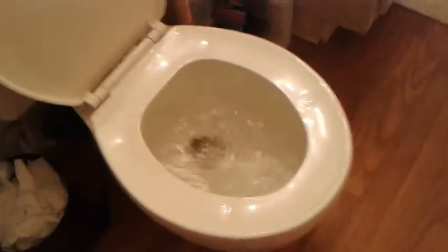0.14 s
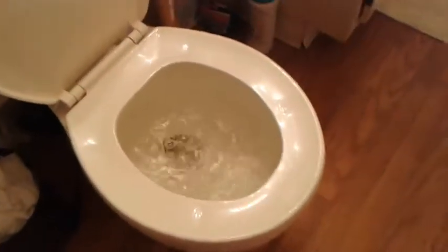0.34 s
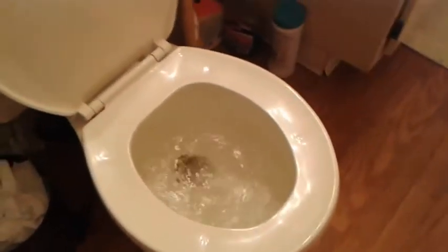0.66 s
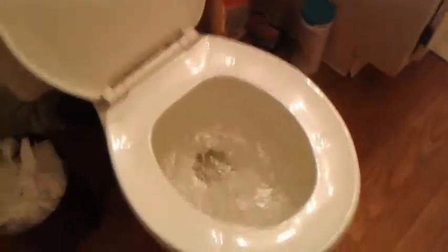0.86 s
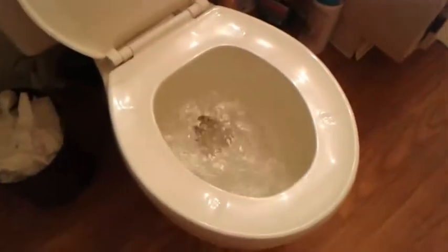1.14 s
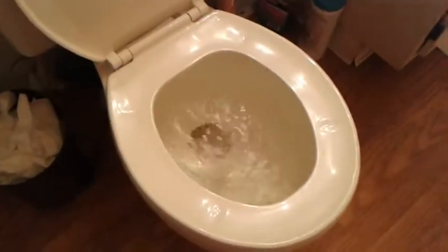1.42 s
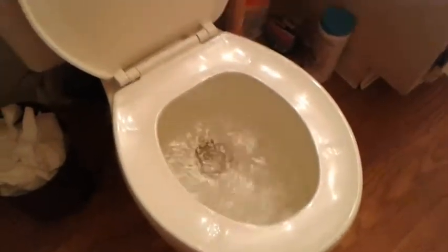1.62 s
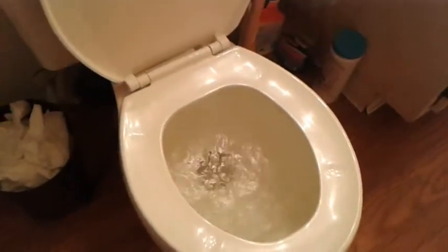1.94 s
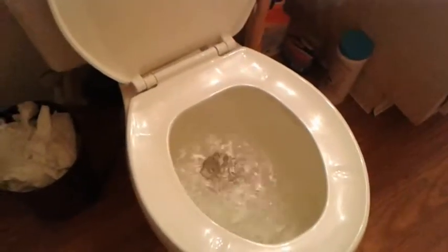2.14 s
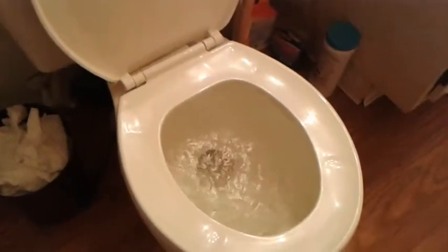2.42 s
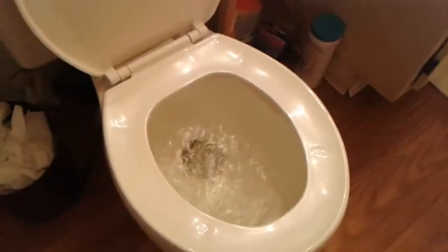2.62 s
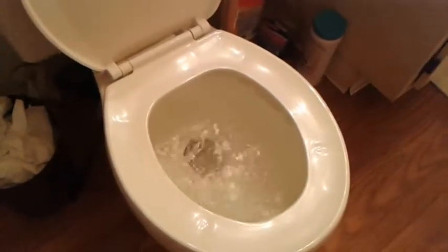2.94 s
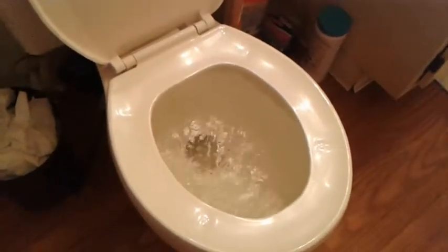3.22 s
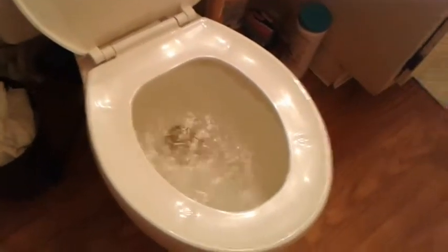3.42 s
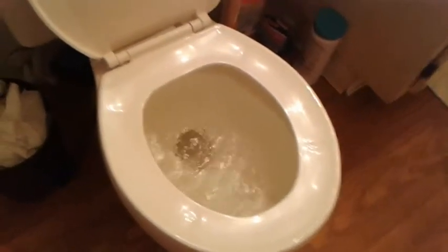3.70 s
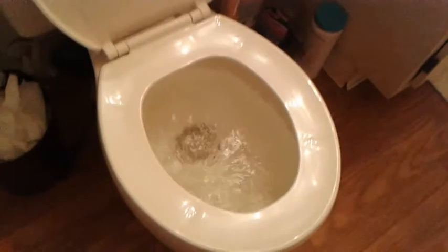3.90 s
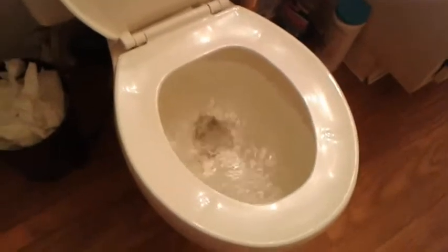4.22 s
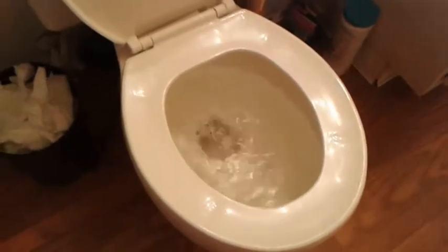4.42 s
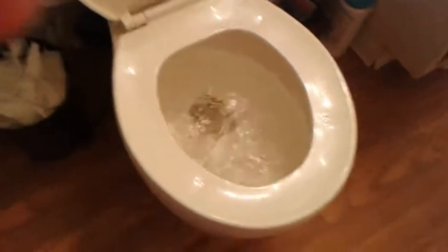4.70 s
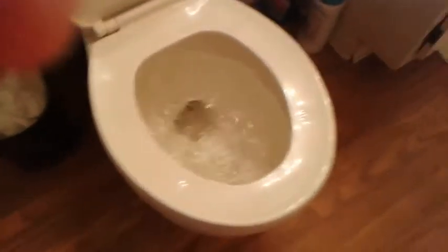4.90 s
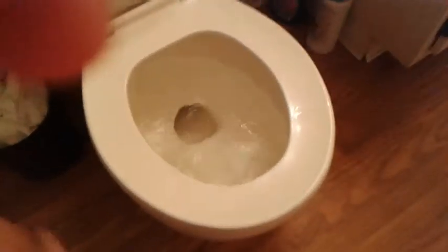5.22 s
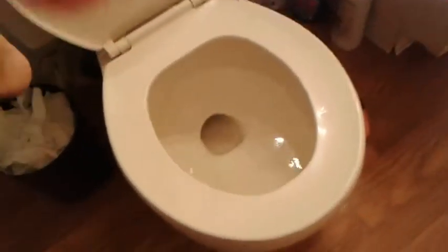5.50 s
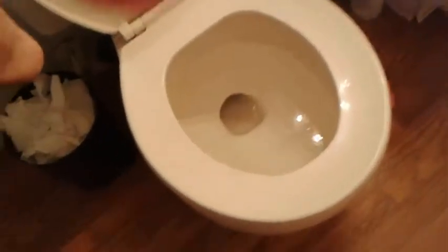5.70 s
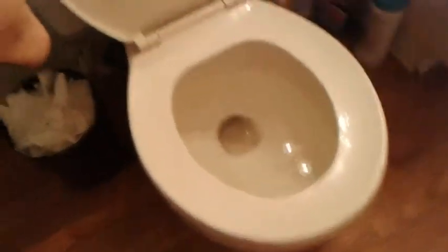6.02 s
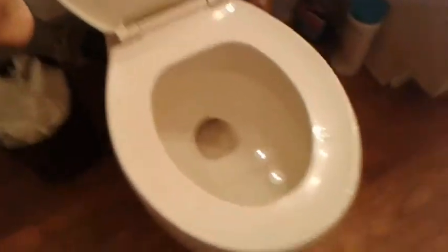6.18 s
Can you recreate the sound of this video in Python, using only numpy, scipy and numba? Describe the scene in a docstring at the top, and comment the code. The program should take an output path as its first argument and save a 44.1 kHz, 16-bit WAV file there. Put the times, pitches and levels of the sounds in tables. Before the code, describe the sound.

A time-reversed flush heard from just above the bowl. Hissing droplets and ringing water tones grow steadily over a faint low hum, with sharp spits and plinking drops each swelling into a sudden stop. Throaty air gulps in the trap get longer and stronger, the spray surges, metal clinks, large bubbles glug, and the water abruptly falls quiet, leaving reversed drips and a last gulp in the small reflective room.

```python
"""A toilet flush in a small bathroom, heard backwards: every splash, bubble and echo swells and then cuts off.
From the start spray hisses (filtered noise and droplets), rim jets whistle and the bowl churns (resonant modes)
over a low hum; spits and drops (rings laid backwards) stand out, and from half a second air gulps in the trap.
Past 5.3 s large bubbles glug, the lever clinks as the rush peaks, a pitched drip follows; the very end fades out.
Two unlike microphone ports hear it all."""
import sys
import numpy as np
from scipy import signal
from scipy.fft import rfft, irfft, next_fast_len
from scipy.io import wavfile
from scipy.ndimage import uniform_filter1d
from numba import njit

SR = 44100
rng = np.random.default_rng(int(sys.argv[2]) if len(sys.argv) > 2 else 0)


def unload_audio(sound):
    """Save the sound as a 16-bit wav file, at the path given as the first command line argument."""
    columns = np.transpose(np.atleast_2d(sound))
    # keep every value between -1 and 1, then stretch to whole-number steps
    steps = np.round(np.clip(columns, -1, 1) * 32767)
    wavfile.write(sys.argv[1], SR, steps.astype(np.int16))


N = 280031  # samples


def undb(db):
    """Level to amplitude: 20 dB is a factor of ten."""
    return 10 ** (np.asarray(db) / 20)


def unit(x):
    """Normalization: scale to an rms of 1."""
    return x / np.sqrt(np.mean(x ** 2))


def curves(table):
    """Linear interpolation in time: each column of a table at every sample."""
    s, *columns = np.transpose(table)
    return [np.interp(np.arange(N) / SR, s, column_values) for column_values in columns]


def over_hz(table, count):
    """Interpolation in log frequency: the table at every bin of a real transform of count samples."""
    hz, value = np.transpose(table)
    bin_hz = np.arange(count // 2 + 1) * SR / count
    return np.interp(np.log(bin_hz + 1), np.log(hz), value)


def walk(rate):
    """Smoothed random fluctuation: levels held 1 / rate seconds and slewed twice; spread near 1."""
    hold = int(SR / rate)
    steps = np.repeat(rng.standard_normal(N // hold + 1), hold)
    return 1.18 * uniform_filter1d(uniform_filter1d(steps, hold), hold)[:N]


def noise():
    """Incoherent excitation: unrelated white noise for each port."""
    return rng.standard_normal((2, N))


@njit
def svf(x, hz, width):
    """Resonance with a moving centre: a state-variable band-pass run from the end to the start."""
    y, band, low = np.empty(len(x)), 0., 0.
    for i in range(len(x) - 1, -1, -1):
        g, damping = np.tan(np.pi * hz[i] / SR), width / hz[i]
        v = (band + g * (x[i] - low)) / (1 + g * (g + damping))
        band, low = 2 * v - band, low + 2 * g * v
        y[i] = damping * v
    return y


@njit
def add(out, s, size, hz, t60, glide, edge, phase):
    """Damped oscillation laid backwards from s: it builds over edge cycles and climbs in pitch as it dies."""
    for n in range(len(s)):
        count = int(t60[n] * SR)
        z, fall = size[n] * np.exp(1j * phase[n]), np.exp(-np.log(1000) / count)
        turn = np.exp(2j * np.pi * hz[n] / SR)
        bend = np.exp(2j * np.pi * hz[n] / SR * glide / count)
        gap, close = 1., np.exp(-hz[n] / SR / edge)
        last = int(s[n] * SR)
        for i in range(last, max(last - count, 0), -1):
            out[i] += z.imag * (1 - gap) ** 2
            z, turn, gap = z * turn * fall, turn * bend, gap * close


def rings(s, db, hz, t60, glide, edge=1.9):
    """Damped oscillations at two points: each ring reaches the two ports with its own phase."""
    out, phase = np.zeros((2, N)), rng.uniform(0, 2 * np.pi, (len(s), 2))
    s, t60 = np.minimum(s, (N - 1) / SR), np.maximum(t60, 1e-3)
    for port in range(2):
        add(out[port], s, undb(db), 1. * hz, t60, glide, edge, phase[:, port].copy())
    return out


def bubbles(per_s, low_hz, high_hz, cycles, scatter_db):
    """Bubble resonance, pitch set by size: a random swarm with uneven pitches and levels."""
    u = rng.random((int(per_s * N / SR), 3)).T
    hz = low_hz * (high_hz / low_hz) ** u[1]
    return unit(rings(u[0] * N / SR, scatter_db * u[2] ** 2, hz, cycles / hz, 0.35))


def resonate(drive, modes, flicker_db, rate, pitch=1):
    """Modal resonance: each mode flickers on its own, and all follow one pitch ratio."""
    out = np.zeros((2, N))
    for hz, width, db in modes:
        gain = undb(db + flicker_db * walk(rate)) / np.sqrt(width)
        out += gain * np.array([svf(x, hz * pitch * np.ones(N), 1. * width) for x in drive])
    return unit(out)


def spray(db):
    """Broadband impact noise: hiss and fine droplets on the porcelain, shaped in frequency."""
    # Each row: frequency in Hz, relative spectral level in dB per Hz.
    spectrum = [(1410, -20), (2400, -9.5), (2620, -13), (3440, -9), (4840, -5.5), (5950, 2.5), (7480, -7),
                (8160, -20), (8800, -42.5), (11400, -61.5), (19400, -120)]
    count = next_fast_len(N)
    droplets = bubbles(900, 3470, 8650, 39, 27.0)
    fizz = noise() * undb(2.12 * walk(40)) + undb(-8.5) * droplets
    shaped = irfft(rfft(fizz, count) * undb(over_hz(spectrum, count)), count)[:, :N]
    return unit(shaped) * undb(db)


def splash(db):
    """Bubble-driven resonance: coarser droplets where the streams meet."""
    drive = noise() + undb(-1.0) * bubbles(500, 2693, 4900, 53, 1.0)
    # Each row: frequency in Hz, width in Hz, relative level in dB.
    modes = [(2710, 620, -2.5), (3070, 1200, 7.5), (3290, 90, -4), (3700, 430, -1.5), (4470, 390, -3.0)]
    return resonate(drive, modes, 1.4, 18.0) * undb(db - 7.0)


def jets(db):
    """Cavity resonance: water through the rim holes sings in the hollow rim; upper modes drift, lower stay."""
    # Each row: frequency in Hz before the pitch ratio, width in Hz, relative level in dB.
    upper_modes = [(2395, 26, 2), (2435, 24, 2), (2465, 24, 5), (2510, 26, 4), (2545, 26, 4),
                   (2600, 34, -1), (2670, 30, -9), (2865, 34, -5)]
    # Each row: frequency in Hz, width in Hz, relative level in dB.
    lower_modes = [(1790, 30, -9), (1990, 22, -2), (2140, 18, -1), (2172, 20, -4), (2265, 45, -2),
                   (2170, 260, -6)]
    # Each row: time in seconds, pitch ratio of the upper modes, lower modes against upper in dB,
    # pitch wander as a share.
    drift = [(0, 0.99, -3, .002), (2.6, 1.0, -6.5, .003), (3.2, 1.02, -7.5, .03), (3.95, 1.01, -6.5, .03),
             (4.35, 1.075, -10, 0.022), (4.7, 1.06, -8.5, .02), (5.3, 0.98, -5, .02)]
    drive = noise() * undb(3.2 * walk(50)) + undb(-11.5) * bubbles(400, 1777, 3006, 21.4, 6.0)
    pitch, low_db, wander = curves(drift)
    upper = resonate(drive, upper_modes, 1.8, 12., pitch + wander * walk(10))
    lower = resonate(drive, lower_modes, 2.6, 14.)
    return unit(upper + undb(low_db) * lower) * undb(db - 0.5)


def churn(db):
    """Bubble-driven resonance at lower pitch: larger bubbles tumbling in the bowl."""
    # Each row: frequency in Hz, width in Hz, relative level in dB.
    modes = [(1010, 86, -20), (1122, 32, -3), (1343, 22, -5.5), (1435, 35, -4.5), (1663, 25, -1.5),
             (1780, 49, -0.5), (1340, 1300, 4)]
    drive = noise() + undb(-8.5) * bubbles(250, 760, 2003, 17.4, 8.4)
    return resonate(drive, modes, 3.0, 6.) * undb(db - 4)


def column(db, hz, width, modes, skirt_db):
    """Air-column resonance: a centre moving with the water level picks out the fixed modes near it."""
    drive = noise() + undb(-14.0) * bubbles(120, 202.4, 969.5, 29.3, 7.5)
    hz = hz * (1 + 0.028 * walk(10))
    skirt = np.array([svf(svf(x, hz, 2 * width), hz, 2 * width) for x in drive])
    near = np.array([svf(x, hz, width) for x in skirt])
    sound = resonate(near, modes, 1.0, 3.3) + undb(skirt_db) * unit(skirt)
    # the passing flow keeps the column sounding at a steady strength
    span = int(.07 * SR)
    power = uniform_filter1d(uniform_filter1d(sound[0] ** 2, span), span)
    return sound / np.sqrt(power) * undb(db + 1.2 * walk(14))


def trap(low_db, low_hz, high_db, high_hz, drain_db):
    """Coupled air cavities: two columns in the trap and the deeper drain."""
    # Each row of all three: frequency in Hz, width in Hz, relative level in dB.
    low_modes = [(300, 17, -3), (330, 13, 3), (347, 12, 4), (372, 14, -2), (397, 14, 3), (430, 17, -4),
                 (465, 20, -1), (498, 20, -1), (545, 30, -7)]
    high_modes = [(673, 23, -2), (699, 19, 6), (746.7, 14, 9.5), (797, 17, 9.5), (849, 28, 8.5),
                  (770, 290, -8)]
    drain_modes = [(212.7, 7.5, -0.5), (272, 55, 8.5)]
    drain = resonate(noise(), drain_modes, 1.8, 5.0) * undb(drain_db)
    low = column(low_db, low_hz, 115.0, low_modes, -4.5)
    high = column(high_db, high_hz, 210.0, high_modes, -0.28)
    return low + high + drain


def hum_level():
    """Slow amplitude modulation: the hum wavers, with a few wider swells and dips."""
    # Each row: centre in seconds, half length in seconds, change in dB.
    swings = [(4.4, 0.26, -9), (5.08, 0.077, -12), (5.312, 0.095, 10.5), (5.649, 0.18, -27),
              (6.046, 0.081, 2.5)]
    t = np.arange(N) / SR
    swing_db = sum(db * np.exp(-((t - s) / half) ** 2) for s, half, db in swings)
    return -50.5 + 2 * walk(9) + swing_db


def hum(db):
    """Narrow-band noise: a wavering low hum over a broad rumble."""
    modes = [(101.2, 10.2, 16.5), (75, 30, -29.0), (140, 76, 8)]  # (Hz, width Hz, relative dB)
    return resonate(noise(), modes, 0.86, 5.8) * undb(db)


def cluster(table, cycles, spread_s, spread_hz, edge):
    """Bubble entrainment: each listed splat is one main bubble and a ragged few smaller ones."""
    s, db, hz = np.repeat(table, 4, axis=0).T
    # every fourth bubble is a main one, left exactly as listed
    u = rng.random((len(s), 3)).T * (np.arange(len(s)) % 4 > 0)
    s = s - spread_s * u[0]
    db = db - 4 * (u[1] > 0) - 9 * u[1]
    spread = spread_hz * (u[2] - .5 * (u[2] > 0))
    return rings(s, db, hz + spread, cycles / hz, 0.089, edge)


def singles():
    """Damped bubble rings: spits and drops stand out of the rush; a spit also has a short wide crack."""
    # Each row of both: nominal time in seconds, level of the main bubble in dB, frequency in Hz.
    spit_table = [(0.145, -3.5, 6050), (0.5483, -13, 5930), (0.918, -10.5, 6280), (1.068, -7.5, 6230),
                  (1.6652, -7, 5840), (1.9974, -7.5, 6270), (2.208, -9, 6230), (2.6778, -4.5, 6180),
                  (3.372, -8.5, 5840), (3.643, -7, 5860), (3.7843, -12, 6500), (3.972, -11, 5800),
                  (4.228, -8, 5900), (4.335, -13, 5800), (4.621, -3.5, 5900), (4.686, -4.5, 5800),
                  (4.8389, -10, 5900), (4.982, -1, 6200), (5.076, -6, 6280), (5.222, -8, 6400),
                  (5.247, 0.5, 6250), (5.434, -8, 5340), (5.544, -8, 4440), (5.664, -6, 5840),
                  (5.6808, -3.5, 6300), (5.7299, -6, 5950), (5.774, -8, 4270), (5.7854, -8, 5960),
                  (5.804, -13, 4570), (5.817, -0.5, 6030), (5.862, -8.5, 5840), (5.976, -16, 6170),
                  (6.051, -11, 3700), (6.052, -17, 4600), (6.1255, -9.5, 3970), (6.126, -14, 4620),
                  (6.126, -15, 6380)]
    drop_table = [(0.284, -17.5, 2540), (0.455, -15, 2350), (0.62, -13.5, 2290), (0.77, -8, 2380),
                  (0.81, -24, 2250), (1.085, -6, 2420), (1.14, -8.5, 2340), (1.3, -12.5, 2475),
                  (1.56, -16, 2090), (1.625, -11.5, 2525), (1.728, -8.5, 2480), (1.799, -9, 2480),
                  (1.963, -6, 2456), (2.078, -7, 2420), (2.26, -14, 2545), (2.394, -17, 2650),
                  (2.71, -12.5, 2960), (2.928, -15, 2370), (3.264, -19, 2980), (3.35, -16.5, 2520),
                  (3.99, -21, 2610), (4.42, -12, 3700), (4.588, -15, 2600), (4.828, -11.5, 2860),
                  (5.196, -12, 2660), (5.284, -13, 2840), (5.509, -11, 2780), (5.95, -23, 2400),
                  (5.985, -22, 2490), (6.083, -16, 2950), (6.232, -22.5, 2480)]
    spits = cluster(np.add(spit_table, [.002, 0, 0]), 40, 0.0057, 980, 1.16)
    s, db, hz = np.transpose(spit_table)
    cracks = rings(s + .002, db - 2.5, hz, 12 / hz, 0.55, 0.62)
    drops = cluster(np.add(drop_table, [.004, 0, 0]), 65, 0.018, 150, 3.9)
    return spits + cracks + drops


def gulping():
    """Power addition: gulps swell, hold and cut off above the steady flow, each pulling the low column's pitch."""
    # Between gulps. Each row: time in seconds, then levels in dB of the low air column, the upper
    # column and the drain.
    steady = [(0.0, -45.5, -47, -60), (0.16, -51, -58, -63), (0.95, -54, -58, -55.5),
              (1.4, -55.5, -56, -56), (1.75, -52, -49, -63), (1.95, -38.5, -39, -62),
              (2.5, -40, -38.5, -55), (3.3, -42, -36.5, -52), (3.8, -39.5, -36, -48), (4.6, -38, -31, -55),
              (5.0, -34.5, -42, -36), (5.3, -41, -36.5, -42), (5.57, -55, -37, -48), (5.7, -55, -35, -45),
              (5.85, -48.5, -47, -41), (6.25, -53, -38, -35)]
    # Each row: start in seconds, end in seconds, low column in dB, upper column in dB, centre of the
    # low column at the start in Hz, at the end in Hz. Where the end comes first, the slopes cross lower.
    gulps = [(0.574, 0.65, -41, -43.5, 494, 520), (0.758, 0.87, -42, -51, 450, 499),
             (1.071, 1.2, -41, -41.5, 417, 508), (1.292, 1.41, -43, -73, 512, 490),
             (1.465, 1.59, -41.5, -42.5, 430, 494), (1.64, 1.8, -42, -43.5, 494, 500),
             (1.813, 1.864, -56, -38, 485, 468), (2.064, 2.27, -37.5, -39, 404, 410),
             (2.725, 2.889, -30.5, -34, 335, 426), (2.976, 3.28, -28.5, -33.5, 351, 403),
             (3.42, 3.734, -30, -33.5, 359, 399), (3.857, 4.2, -38, -48, 418, 320),
             (4.122, 4.22, -34, -46.5, 338, 367), (4.33, 4.5, -34.5, -43.5, 350, 347),
             (4.61, 4.791, -31, -60, 322, 355), (4.826, 5.188, -30, -32.5, 360, 303),
             (5.337, 5.4, -34.5, -46, 620, 554), (5.455, 5.54, -33, -34, 314, 312),
             (5.725, 5.765, -35, -33, 334, 307), (5.8, 5.813, -30.5, -52, 321, 326),
             (5.97, 6.05, -34, -42, 423, 397), (6.095, 6.05, -32.5, -50, 324, 317),
             (6.194, 6.15, -25, -30.5, 445, 440)]
    swell_s, cut_s = 0.051, 0.0074  # time to change by 10 dB
    t = np.arange(N) / SR
    low_db, upper_db, drain_db = curves(steady)
    low, upper = undb(2 * low_db), undb(2 * upper_db)  # powers
    weighted_hz = low * (507 - 14.2 * t)  # the centre sinks 14.2 Hz per second
    for start, end, gulp_db, gulp_upper_db, start_hz, end_hz in gulps:
        shape_db = -10 * np.maximum(np.maximum((start - t) / swell_s, (t - end) / cut_s), 0)
        power = undb(2 * (gulp_db + shape_db))
        glide_hz = np.interp(t, [start, max(end, start)], [start_hz, end_hz])
        low = low + power
        weighted_hz = weighted_hz + power * glide_hz
        upper = upper + undb(2 * (gulp_upper_db + shape_db))
    lift_db = 10 * np.log10(low) - low_db
    low_hz, upper_hz = weighted_hz / low, 800.5 - 18.4 * t
    drain_db = drain_db + 0.18 * lift_db
    return lift_db, (low_db + lift_db, low_hz, 10 * np.log10(upper), upper_hz, drain_db)


def glugs():
    """Large-bubble resonance: single low rings in the drain."""
    # Each row: time in seconds, level in dB, frequency in Hz, 60 dB decay in seconds.
    s, db, hz, t60 = np.transpose([(5.465, -19.5, 310, .14), (5.525, -16, 330, .24), (5.752, -14, 322, .24),
                                   (5.815, -20, 320, .12), (6.06, -19, 405, .3), (6.13, -17.5, 315, .22)])
    return rings(s, db, hz, t60, 0.061, 1.9)


def lever_and_drip():
    """Free vibration: the flush lever rings at fixed pitches; the last row is a pitched drip."""
    # Each row: time in seconds, level in dB, frequency in Hz, 60 dB decay in seconds.
    s, db, hz, t60 = np.transpose([(5.6, -14.5, 4738, .2), (5.599, -17, 5100, .025), (5.48, -15, 3800, .04),
                                   (5.468, -15, 3400, .04), (5.462, -19, 3700, .02),
                                   (6.052, -19, 3650, .06)])
    return rings(s, db, hz, t60, 0.)


def room(x, wet_db):
    """Reverberation from hard walls, time-reversed: a dense tail of echoes comes before each sound."""
    t60_s = 0.27
    t = np.arange(int(.4 * SR)) / SR
    tail = rng.standard_normal((2, len(t))) * undb(-60 * t / t60_s) * (t > .002)
    tail /= np.sqrt(np.sum(tail ** 2, axis=1, keepdims=True))
    echoes = signal.fftconvolve(x[:, ::-1], tail, axes=1)[:, N - 1::-1]
    return x + undb(wet_db) * echoes


def scene():
    """Superposition: water and lever in the room, trap and hum beneath; all fades at the very end."""
    # Each row: time in seconds, then levels in dB, before each source's own trim, of the spray,
    # the coarser splash, the rim jets and the churn in the bowl.
    flow = [(0.0, -35.5, -41, -40, -37.5), (0.2, -32, -39, -46.5, -47), (0.5, -31.5, -38, -37, -43),
            (0.7, -31, -50, -35, -46), (0.77, -30.5, -55, -29.5, -41.5), (0.97, -33.5, -62, -31, -52),
            (1.08, -29.5, -49, -28, -38.5), (1.28, -30.5, -46, -30, -46), (1.85, -31.5, -39, -29, -40.5),
            (2.14, -30.5, -22.5, -27.5, -35), (2.32, -30.5, -29.5, -27, -38),
            (2.49, -29.5, -37, -28.5, -38.5), (2.7, -28, -24.5, -29, -37.5),
            (2.79, -28.5, -28, -44.5, -36.5), (2.92, -31, -28.5, -27, -35.5),
            (3.03, -30, -32, -48.5, -34.5), (3.13, -26, -43, -50, -39.5), (3.3, -29, -31.5, -32.5, -35),
            (3.55, -26.5, -23.5, -41, -35), (3.62, -26.5, -43, -66, -42.5), (3.74, -31, -27, -32, -34),
            (3.97, -29, -27.5, -35, -36.5), (4.05, -29, -24.5, -39, -33.5),
            (4.27, -28.5, -26.5, -36.5, -37.5), (4.47, -27.5, -30.5, -29.5, -32.5),
            (4.63, -27.5, -24, -32.5, -40), (4.72, -28, -23.5, -35.5, -35), (5.05, -25, -31, -46, -38),
            (5.35, -26, -26.5, -39.5, -34.5), (5.46, -24, -25.5, -37, -36), (5.57, -20, -22, -39.5, -32.5),
            (5.63, -22, -19, -34, -35.5), (5.69, -20, -19.5, -29.5, -30.5), (5.76, -26.5, -26.5, -42, -34),
            (5.82, -32, -35, -51, -47.5), (5.9, -37.5, -35, -52, -49), (6.05, -36, -35.5, -47, -43),
            (6.18, -32, -35, -48.5, -40), (6.28, -36.5, -39, -51, -41.5)]
    spray_db, splash_db, jets_db, churn_db = curves(flow)
    lift_db, columns = gulping()
    # jets and churn rise a little with each gulp, in dB per dB
    rush = spray(spray_db) + splash(splash_db + 2.0 * walk(8))
    rush = rush + jets(jets_db + 0.16 * lift_db) + churn(churn_db + 0.18 * lift_db)
    water = room(rush, -7.5) + room(glugs(), -8.0)
    accents = room(singles() + lever_and_drip(), -3.0)
    fade = undb(-250 * np.maximum(np.arange(N) / SR - 6.27, 0))  # 250 dB per second from 6.27 s
    return fade * (water + accents + trap(*columns) + hum(hum_level()))


def record(dry):
    """Partial coherence: the ports share most of the bass and differ in colour; peaks round, both ends are cut."""
    # Each row: frequency in Hz, left minus right in dB.
    port_colour = [(200, 0), (700, 2), (1900, 2.5), (2500, 9.5), (3500, 10.5), (6000, 14.5), (7200, 3),
                   (7800, -14.5), (8600, 7.5)]
    # Each row: frequency in Hz, share common to both ports.
    likeness = [(100, 0.75), (350, 0.9), (750, 0.64), (1300, 0.2), (2500, 0.17), (4000, 0.28), (6000, 0.2)]
    count = next_fast_len(N)
    left, own = rfft(dry, count)
    share = np.clip(over_hz(likeness, count), 0, 1)
    tilt = undb(over_hz(port_colour, count) / 2)
    right = share * left + np.sqrt(1 - share ** 2) * own
    # hold the level of the two ports' sum whatever the tilt and share
    both = np.array([left * tilt, right / tilt]) * 2 / np.sqrt(tilt ** 2 + tilt ** -2 + 2 * share)
    bass_cut = signal.butter(6, 64, "high", fs=SR, output="sos")
    both = signal.sosfilt(bass_cut, irfft(both, count)[:, :N])
    both = .92 * np.tanh(both / .92)
    treble_cut = signal.ellip(10, .5, 80, 8650, fs=SR, output="sos")
    return signal.sosfilt(treble_cut, both)


dry = scene()
out = record(dry)
unload_audio(out)
```